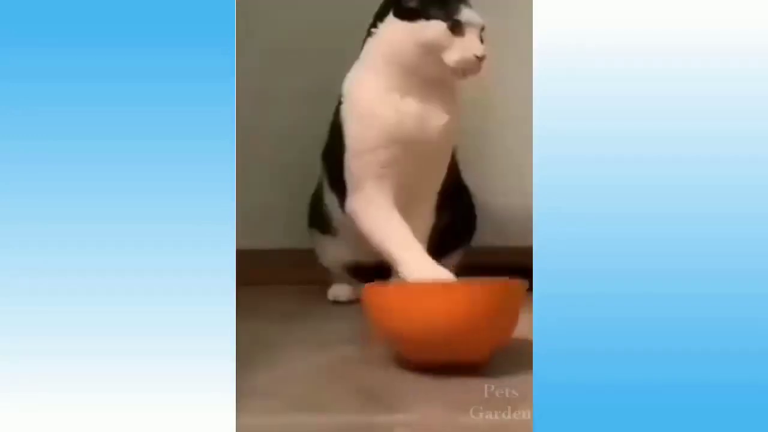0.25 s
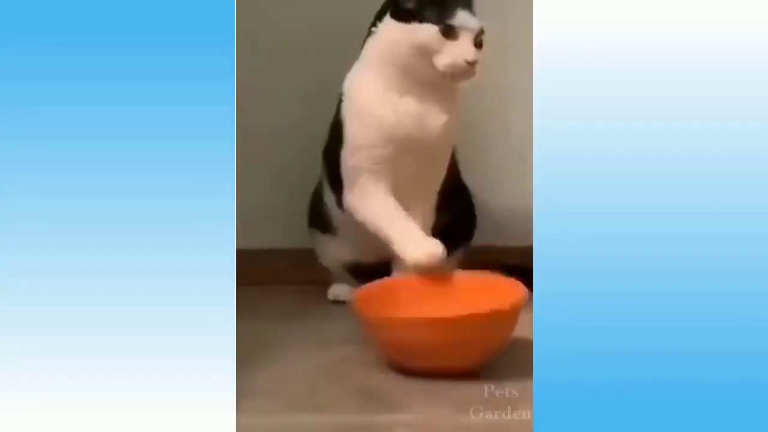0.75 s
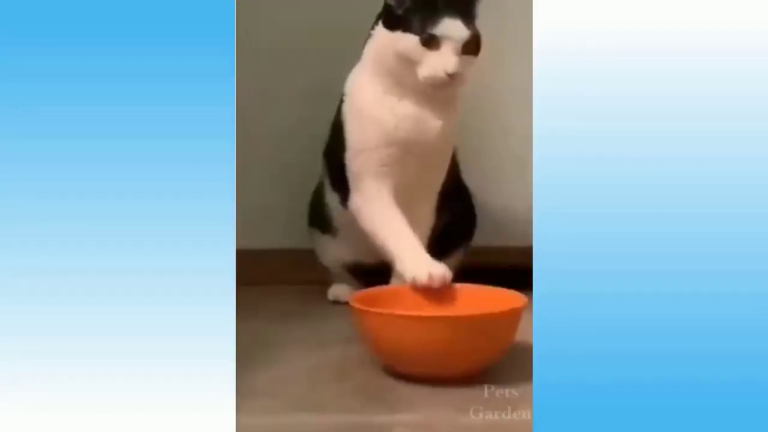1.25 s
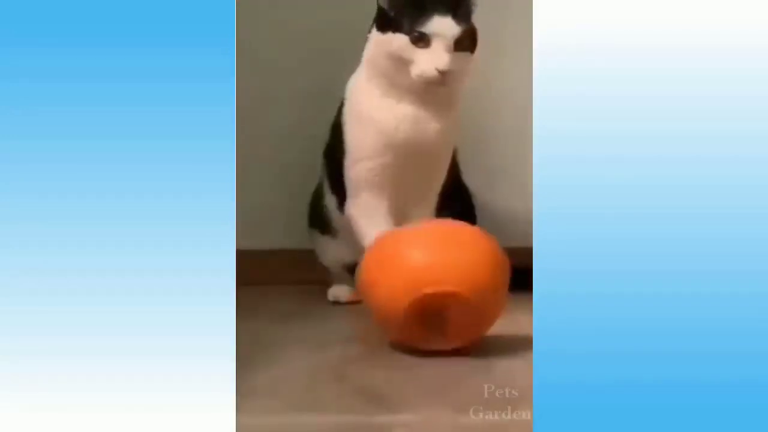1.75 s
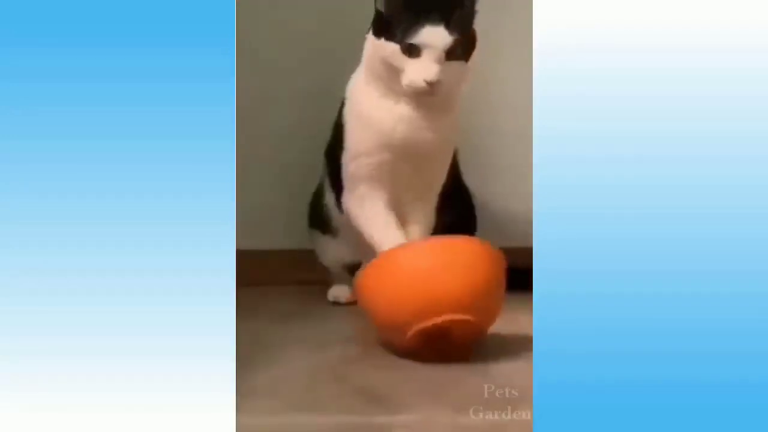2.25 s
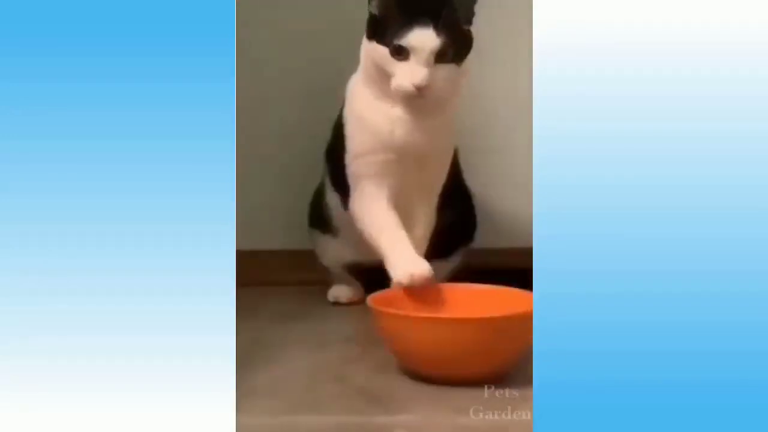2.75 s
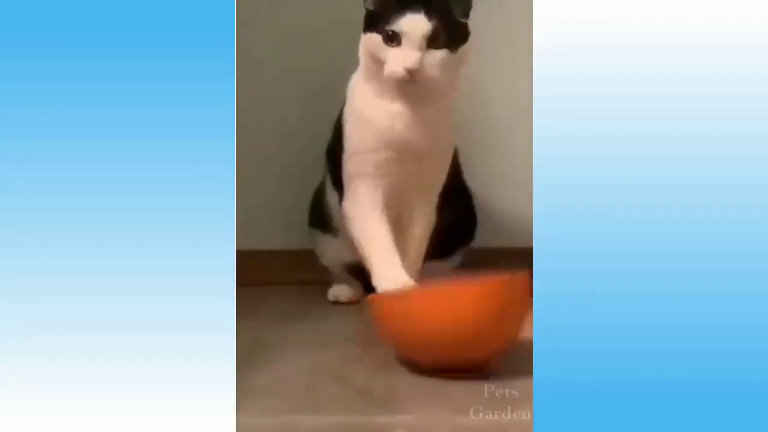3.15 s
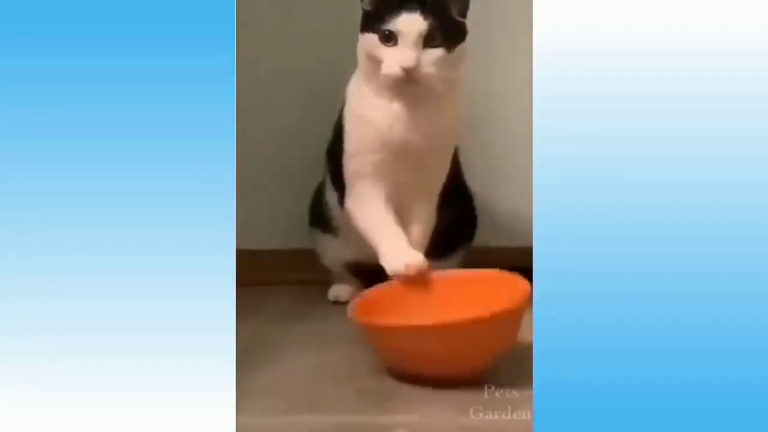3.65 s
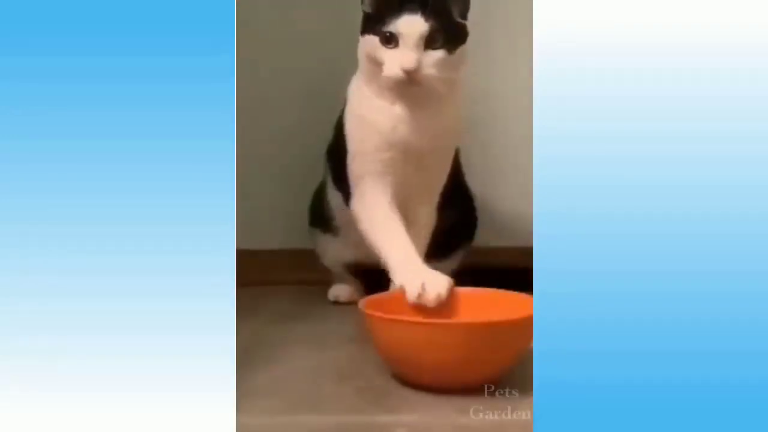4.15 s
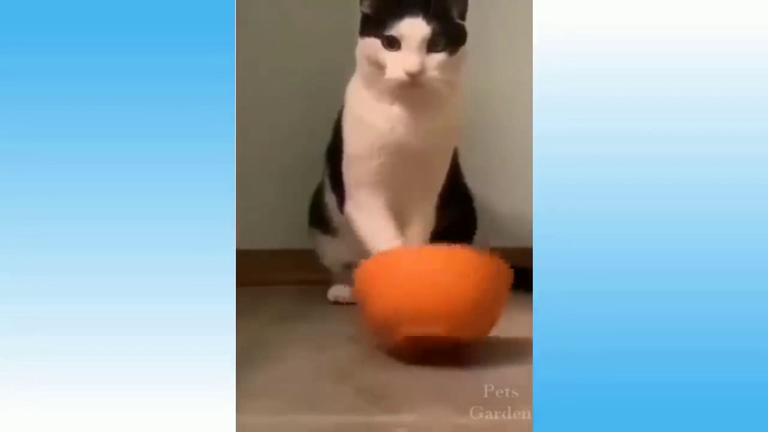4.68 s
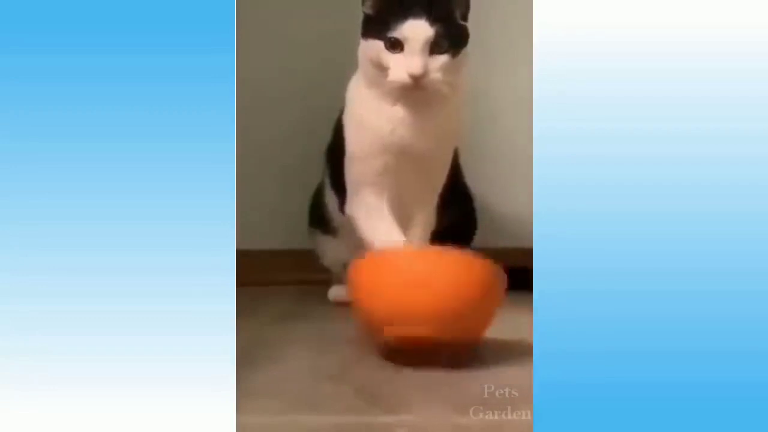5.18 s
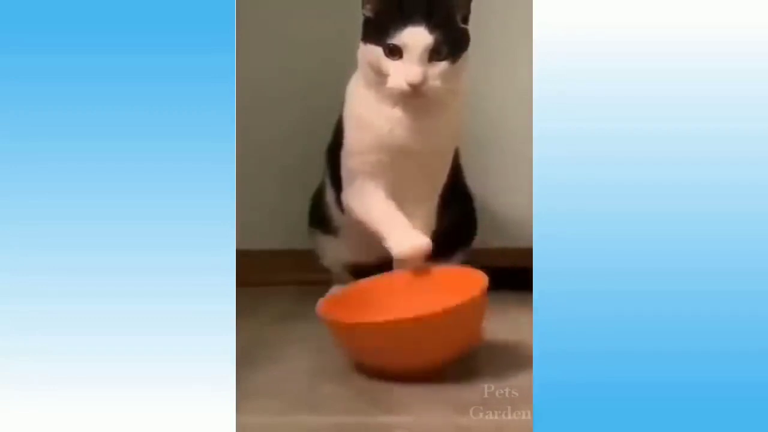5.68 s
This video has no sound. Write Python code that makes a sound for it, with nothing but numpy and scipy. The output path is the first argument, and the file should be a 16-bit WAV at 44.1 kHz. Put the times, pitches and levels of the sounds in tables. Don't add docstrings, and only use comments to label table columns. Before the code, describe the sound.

A cat paws a light, empty plastic bowl on a hard floor. It tips, scrapes briefly and slams down with loud, hollow, mid-pitched clonks, followed by softer bounces and taps. Bursts come irregularly with short gaps. Close phone microphone in a small bare room, short bright reverberation, faint hush and low hum beneath.

```python
import sys
import numpy as np
from scipy import signal
from scipy.fft import rfft, irfft, next_fast_len
from scipy.io import wavfile
from scipy.ndimage import uniform_filter1d

SR = 44100
rng = np.random.default_rng(int(sys.argv[2]) if len(sys.argv) > 2 else 0)


def volts(x):
    e = np.asarray(x, float) / 20
    return 10 ** e


def to_wav(s):
    ch = np.atleast_2d(s).T
    pcm = np.round(np.clip(ch, -1, 1) * 32767)
    wavfile.write(sys.argv[1], SR, pcm.astype(np.int16))


N = 261072

# f/Hz, width/Hz, level/dB
WALL_MODES = [(647, 250, 0), (424, 160, -3), (784, 250, -4)]
# f/Hz, width/Hz, level/dB
FLOOR_MODES = [(75, 35, -3.5), (102, 22, -5), (150, 38, 1), (249.4, 37, -0.5), (321, 26, -2)]
# f/Hz, level/dB
EDGE_SPECTRUM = [(1500, -39), (2500, 2), (3500, 8.5), (5000, 7.5), (7000, 0.5), (9000, -12.5), (11000, -18),
                 (13000, -17.5)]


def unit(x):
    return x / np.sqrt(np.mean(x ** 2) + 1e-20)


def along(points, hz):
    f, v = np.transpose(points)
    return np.interp(np.log(hz + 1), np.log(f + 1), v)


def filtered(x, response):
    m = next_fast_len(x.shape[-1] + 4096)
    spectrum = rfft(x, m) * response(np.fft.rfftfreq(m, 1 / SR))
    return irfft(spectrum, m)[..., :x.shape[-1]]


def resonance(f, centre, width):
    return 1j * f * width / (centre ** 2 - f * f + 1j * f * width)


def modes(table):
    def response(f):
        total = 0
        for k, (centre, width, db) in enumerate(table):
            ring = SR / (np.pi * width) * resonance(f, centre, width)
            total = total + (-1) ** k * volts(db) * ring
        return total
    return response


def room_tail():
    # f/Hz, t60/s
    decay_times = [(100, 0.69), (400, 0.49), (1000, 0.3), (3000, 0.42), (7000, 0.34), (12000, 0.15)]
    hz, t = np.fft.rfftfreq(256, 1 / SR), np.arange(160) * 128 / SR
    shape = (2, len(hz), len(t))
    z = rng.standard_normal(shape) + 1j * rng.standard_normal(shape)
    decay = volts(-60 * t / along(decay_times, hz)[:, None])
    tail = signal.istft(z * decay, SR, nperseg=256)[1]
    tail = tail * (1 - np.exp(-np.arange(tail.shape[1]) / (0.002 * SR)))
    return np.pad(tail / np.linalg.norm(tail[0]), ((0, 0), (130, 0)))


def add(pair, start, sound, room_db):
    echoes = volts(room_db) * signal.fftconvolve(sound[None], room_tail(), axes=1)
    echoes[0, :len(sound)] += sound
    echoes[1, :len(sound)] += 2.5 * np.diff(np.roll(sound, 20), prepend=0)
    pair[:, start:start + echoes.shape[1]] += echoes


def quiet():
    # f/Hz, density/dB per Hz
    hush_spectrum = [(15, -23.5), (25, -1.5), (79, -8.5), (712, -31), (1200, -15), (1370, -31), (2780, -21),
                     (3080, -29), (6580, -31), (7310, -30), (13000, -40.5)]
    hush = unit(filtered(rng.standard_normal((2, N)), lambda f: volts(along(hush_spectrum, f))))
    hum = unit(filtered(rng.standard_normal(N), modes([(59, 9, 0)])))
    return volts(-76) * hush + volts(-72.5) * hum * [[1], [0]]


def drags():
    # t/s, swell/s, fade/s, peak level/dB, hiss level/dB
    strokes = [(0.0, 0.0024, 0.15, -56, -4.5), (0.201, .095, 0.0047, -39.5, -18.5),
               (1.06, .075, .012, -47, -22), (2.11, 0.062, 0.26, -51.5, -10.5),
               (2.76, 0.04, 0.02, -63, -15), (3.71, .052, 0.046, -56, -10.5),
               (4.39, 0.017, 0.083, -52.5, 3), (4.789, .038, 0.033, -73, -0.5),
               (4.92, 0.038, 0.04, -60, -9.5), (5.16, 0.11, 0.017, -39.5, -11.5),
               (5.265, 0.024, 0.051, -51.5, -2)]
    pair, t = np.zeros((2, N + 2 * SR)), np.arange(SR // 4) / SR
    rim = modes([(1400, 510, -3.5), (1990, 300, -6.1)])
    rumble = modes(FLOOR_MODES + WALL_MODES[1:2])
    hiss = lambda f: volts(along(EDGE_SPECTRUM, f))
    for s, swell_s, fade_s, db, hiss_db in strokes:
        length_s = swell_s + fade_s
        phase = np.where(t < swell_s, 1 - t / swell_s, (t - swell_s) / fade_s)
        stroke = volts(db - 21.5 * phase) * np.clip((length_s - t) / .01, 0, 1)
        grains = rng.standard_normal(len(t)) * volts(2.5 * rng.exponential(1, len(t)))
        grains = grains * (rng.random(len(t)) < .15)
        flat = unit(filtered(grains, lambda f: modes([(820, 110, 0)])(f) ** 2))
        tipped = unit(filtered(grains, lambda f: modes([(960, 110, 0)])(f) ** 2))
        tilt = np.pi / 2 * np.clip(t / length_s, 0, 1)
        hollow = np.cos(tilt) * flat + np.sin(tilt) * tipped
        rumble_db = 1.5 - 0.33 * (db + 53)
        others = volts(-7) * unit(filtered(grains, rim))
        others = others + volts(rumble_db) * unit(filtered(grains, rumble))
        others = others + volts(hiss_db) * unit(filtered(grains, hiss))
        add(pair, max(round(s * SR), 0), stroke * (unit(hollow) + others), room_db=-1.5)
    return pair[:, :N]


def contacts():
    # t/s, peak level/dB,
    # thump/dB, tick/dB
    landings = [(0.081, -17.5, -19.5, -23), (0.097, -33, -2.5, -12.5), (0.3, -26, -5, -19),
                (0.998, -23.5, -17.5, -25.5), (1.025, -35.5, -7.5, -24.5), (1.143, -23, -35, -47.5),
                (1.159, -30, -6, -25.5), (2.219, -9.5, -24.5, -30.5), (2.501, -32, -5, -29),
                (2.743, -43.5, -5.5, -23.5), (3.136, -19.5, -17.5, -23), (3.402, -56.5, -12, 8),
                (3.865, -24.5, -11.5, -22.5), (4.027, -26, -12.5, -32), (4.048, -34, -5.5, -36),
                (5.034, -18, -16, -22.5), (4.822, -70, -10.5, 8.5), (5.261, -25, -8, -16.5),
                (5.871, -18, -21.5, -32.5)]
    # t/s, peak level/dB, hollow f/Hz, wall/dB, tick/dB
    taps = [(0.328, -23.5, 1004, -8, -21.5), (0.479, -19.5, 994, -13, -30.5), (2.797, -41.5, 956, -33, -44),
            (3.117, -11, 1025, -12.5, -20.5), (3.219, -18, 1006, -1.5, -17.5),
            (3.272, -16.5, 986, -7.5, -30.5), (3.759, -46, 1110, 4.5, -38.5), (4.202, -23, 910, -7.5, -19),
            (4.219, -19, 1047, -5.5, -19.5), (4.429, -28.5, 910, 3.5, -12), (4.439, -28, 955, -14, -6),
            (4.539, -34, 1090, 0, -47), (4.587, -41.5, 930, -5, -51), (5.289, -34, 1130, -14, -13),
            (5.316, -39, 1040, 2.5, -6), (5.421, -15.5, 850, -12, -37), (5.544, -15, 1053, 1.5, -21)]
    # t/s, peak level/dB, hollow f/Hz, wall/dB, touch lead/s
    slams = [
        (0.462, -15.5, 1012, -4, 0.0054),
        (0.648, -2.5, 984, -8, .003),
        (1.347, -1, 960, -13, 0.0051),
        (1.506, 0.5, 1012, -13, 0.0042),
        (3.094, -5, 1018, -7, .01),
        (4.384, -13.5, 1060, -3, .007),
        (5.412, -10.5, 1030, -9.5, 0.01),
    ]
    rows = []
    for s, db, thump_db, tick_db in landings:
        rows.append((s, db, 895.5, -14 - 0.02 * (db + 14.5), thump_db, tick_db))
    for s, db, hz, wall_db, tick_db in taps:
        thump_db = -18 - 0.37 * (db + 18)
        rows.append((s, db, hz, wall_db, thump_db, tick_db))
    for s, db, hz, wall_db, lead_s in slams:
        less_db = -0.1622 * (db + 25.5)
        rows.append((s, db, hz, wall_db, -27 + less_db, -22 + less_db))
        rows.append((s - lead_s, db - 3.5 + less_db, hz * 0.98, -13, -25.5, -22.5))
    return rows


def knocks():
    # f/Hz, width/Hz, level/dB
    rim_modes = [(1170, 140, -10.5), (1394.6, 140, -4), (1744, 71, -14), (1985, 210, -4),
                 (2980, 140, -29.5)]
    # f/Hz, width/Hz, level/dB
    shell_modes = [(443, 31, -20.5), (500, 16, -17), (580, 78, -15), (705, 54, -11), (875, 60, -10.5),
                   (1030, 40, -9.5), (1210, 22, -12.5), (1330, 36, -14.5)]
    pair, t = np.zeros((2, N + 2 * SR)), np.arange(SR // 8) / SR
    push = np.exp(-.5 * ((t - .0005) / 0.00011) ** 2)
    push /= push.sum()
    tick_shape = volts(-60 * t / 0.064) * (1 - np.exp(-t / 0.0022))

    for s, db, hollow_hz, wall_db, thump_db, tick_db in contacts():
        chance = rng.normal(0, 2.7, size=32)
        width_hz = 75 + 110 * volts(db)
        rim_db = 0.21 * (tick_db + 33.5) - 0.11 * (db + 15)
        hollow = modes([(hollow_hz, width_hz, 0)])
        rim = modes([(c, w, d + e + rim_db) for (c, w, d), e in zip(rim_modes, chance)])
        wall = modes([(c, w, d + e + wall_db + 6) for (c, w, d), e in zip(WALL_MODES, chance[5:])])
        boom = modes([(c, w, d + e + thump_db + 5.5) for (c, w, d), e in zip(FLOOR_MODES, chance[8:])])
        shell = modes([(c, w, d + 2.8 * e - 9 + (wall_db + 8.5) * (c < .9 * hollow_hz))
                       for (c, w, d), e in zip(shell_modes, chance[24:])])
        edge = [(c, d + e) for (c, d), e in zip(EDGE_SPECTRUM, chance[14:])]

        def body_response(f):
            air = volts(3) * resonance(f, hollow_hz, 420) * hollow(f)
            rim_part = rim(f) * resonance(f, 1700, 1500)
            wall_part = volts(2) * resonance(f, 600, 600) * wall(f)
            late = np.exp(-2j * np.pi * f * 0.0037) / (1 + 1j * f / 350) ** 2
            return air - rim_part - wall_part + late * (boom(f) + 1.4 * shell(f))

        tick = filtered(rng.standard_normal(len(t)) * tick_shape, lambda f: volts(along(edge, f)))
        body = filtered(push, body_response)
        knock = volts(db - 7.5) * (body + volts(tick_db + 9) * tick)
        add(pair, round(s * SR) - 4, knock, room_db=-7)
    return pair[:, :N]


def scene():
    # f/Hz, ratio
    port_spread = [(30, .12), (100, .06), (300, 0.11), (1000, 0.26), (2200, 0.59), (3700, 0.55),
                   (4400, 0.2), (5300, .12), (6500, 0.32), (8500, 0.16), (10200, 0.22), (12500, .6)]
    shared, unshared = knocks() + drags() + quiet()
    unshared = filtered(unshared, lambda f: along(port_spread, f))
    return np.array([shared + unshared, shared - unshared])


def squeezed(ports):
    # f/Hz, level/dB
    coarseness = [(300, -23.5), (1200, -18), (2500, -7), (5000, -5.5), (8000, 9), (12000, 1.5)]
    pair = np.array([ports[0] + ports[1], ports[0] - ports[1]]) / 2
    hz, t, z = signal.stft(pair, SR, nperseg=2048)
    power = np.mean(abs(z) ** 2, 0)
    nearby = np.sqrt(abs(uniform_filter1d(power, size=90, axis=0)))
    budget = uniform_filter1d(rng.standard_normal((2, 43, len(t))), size=3, axis=2)
    whim_db = 10 * np.repeat(budget, 24, axis=1)[:, :len(hz)]
    grain = (nearby * volts(along(coarseness, hz))[:, None] + volts(-120)) * volts(whim_db)
    mid, side = signal.istft(np.round(z / grain) * grain, SR, nperseg=2048)[1][:, :N]
    return np.array([mid + side, mid - side])


def top_cut(x):
    return signal.sosfilt(signal.butter(12, 13210, fs=SR, output="sos"), x)


def record(dry):
    # f/Hz, phase/rad
    port_turn = [(100, 0), (600, .22), (1300, .25), (1900, -.6), (2450, -1.8), (2750, -3.1), (3200, -1),
                 (3800, -1.8), (4300, -3.05), (5350, -3.2), (5900, -6.3), (9300, -6.3), (10200, -3.1),
                 (11200, -6.3)]
    sides = np.array([[-1], [1]])
    ports = filtered(dry, lambda f: np.exp(.5j * along(port_turn, f) * sides))
    ports = ports / (1 + abs(ports / .97) ** 6) ** (1 / 6)
    mix = filtered(squeezed(ports), lambda f: f < 13250)
    return top_cut(mix)


dry = scene()
out = record(dry)
to_wav(out)
```